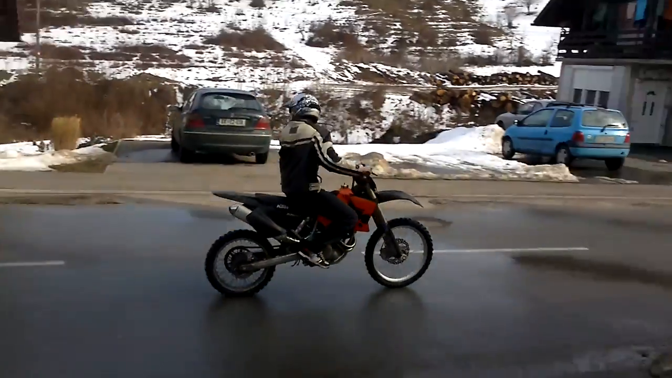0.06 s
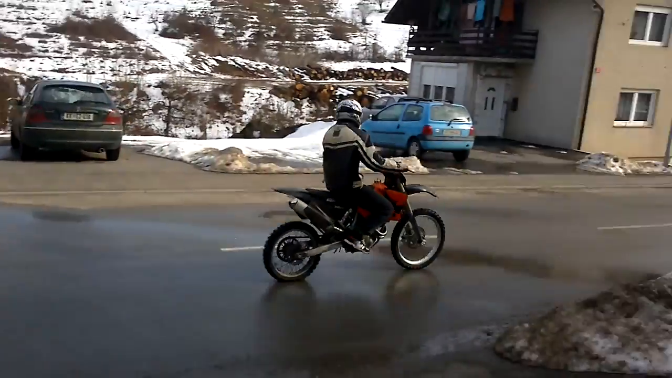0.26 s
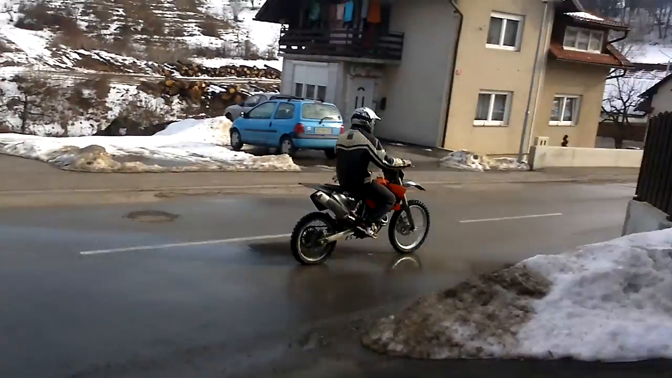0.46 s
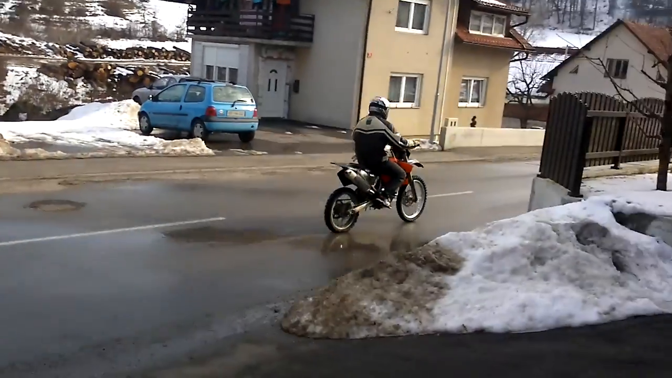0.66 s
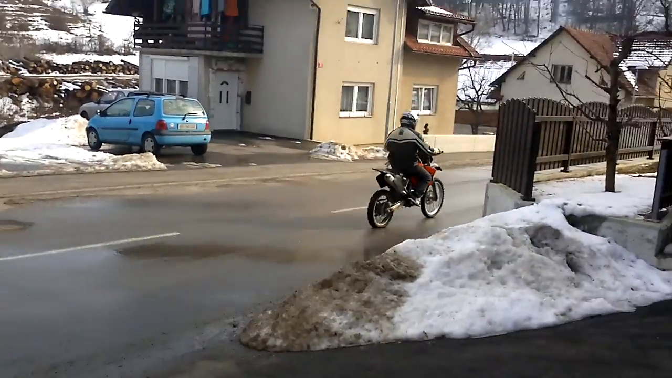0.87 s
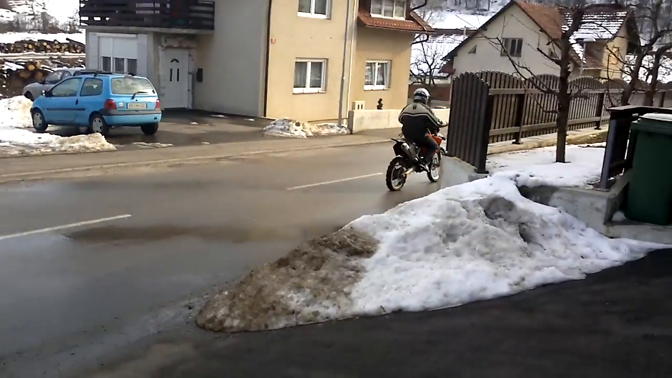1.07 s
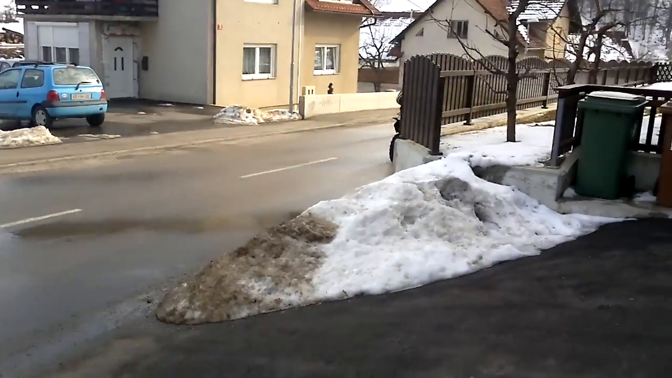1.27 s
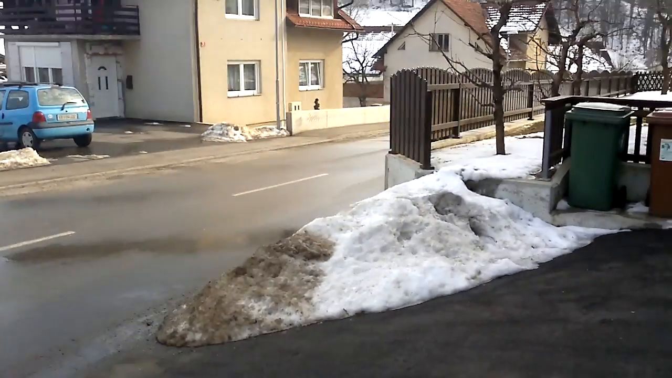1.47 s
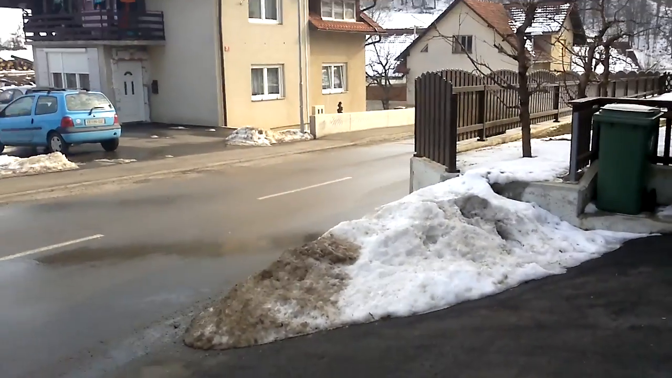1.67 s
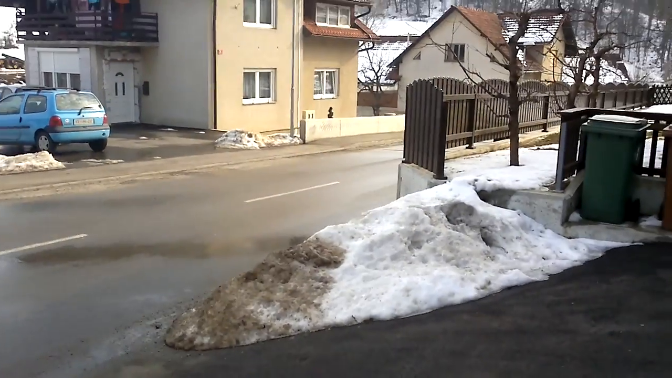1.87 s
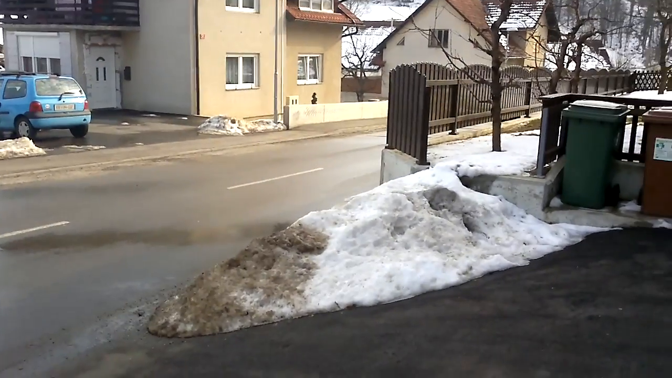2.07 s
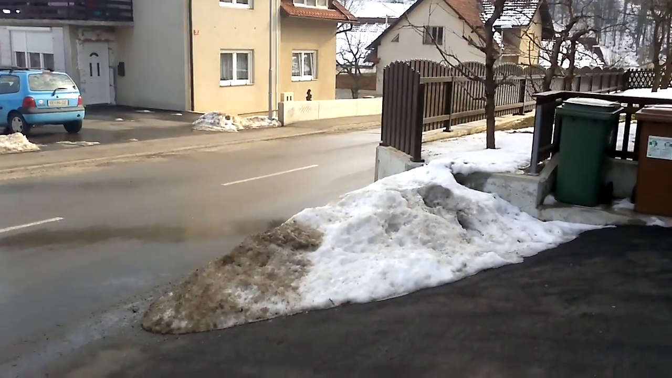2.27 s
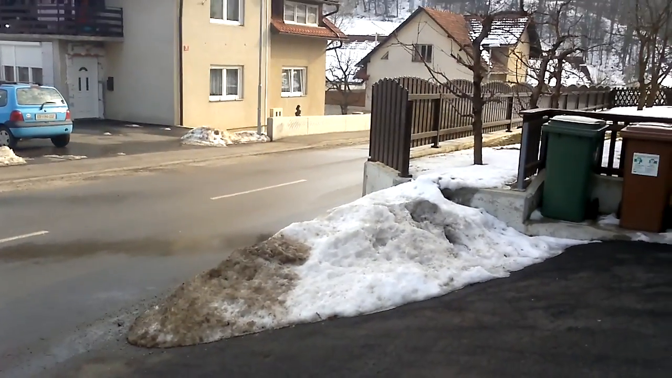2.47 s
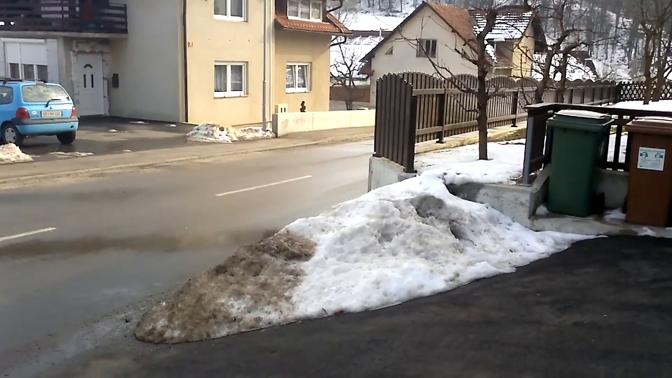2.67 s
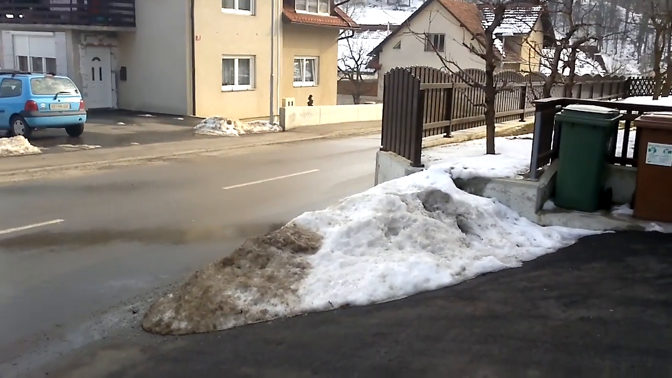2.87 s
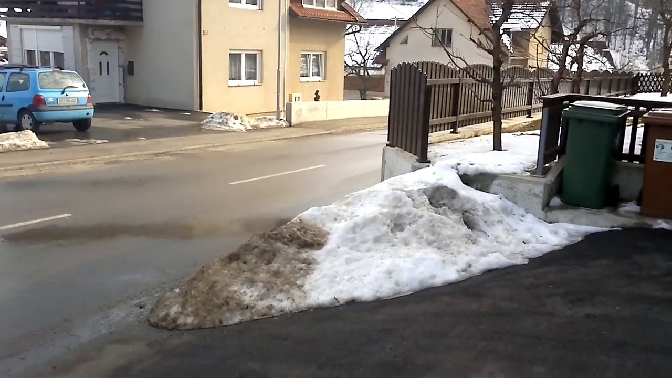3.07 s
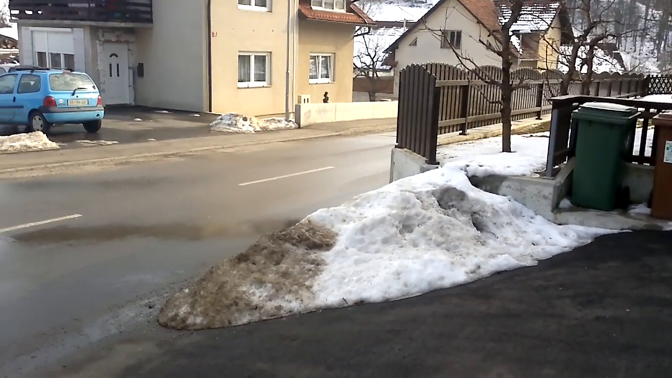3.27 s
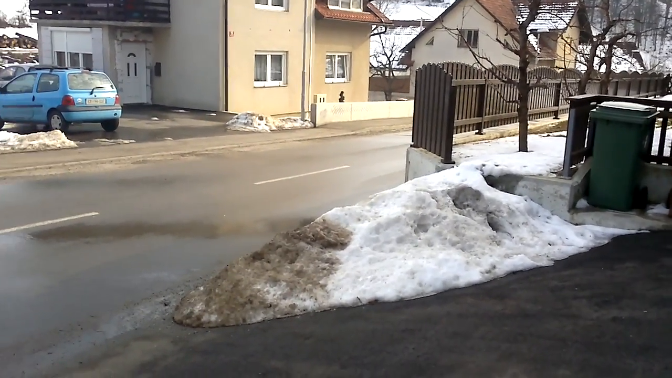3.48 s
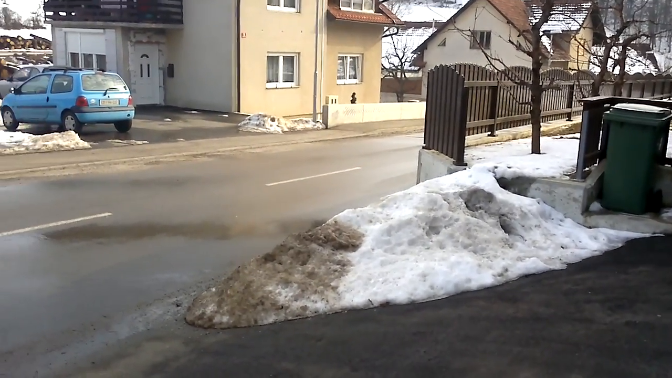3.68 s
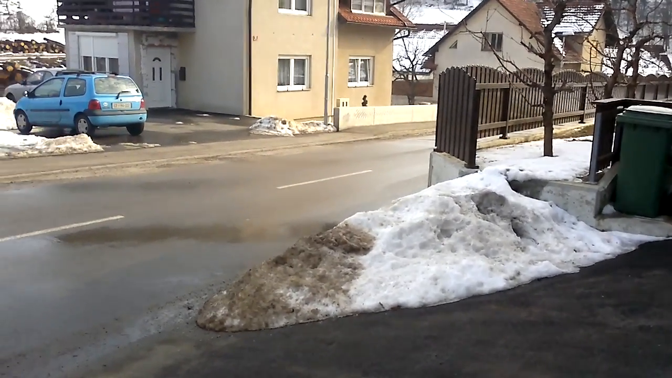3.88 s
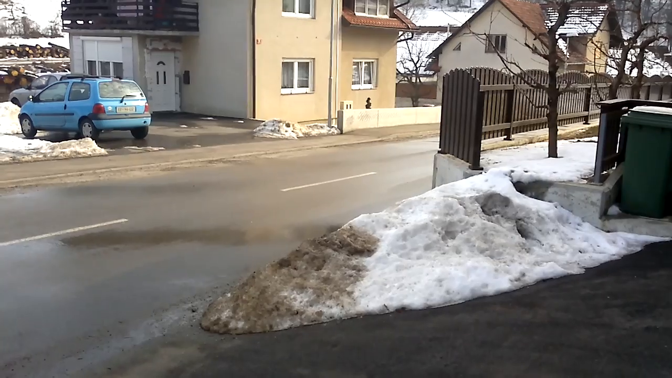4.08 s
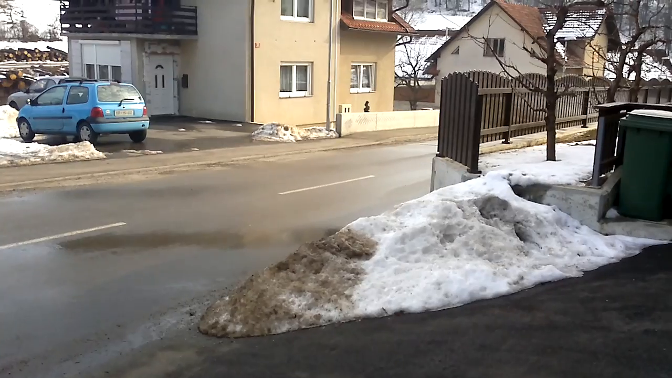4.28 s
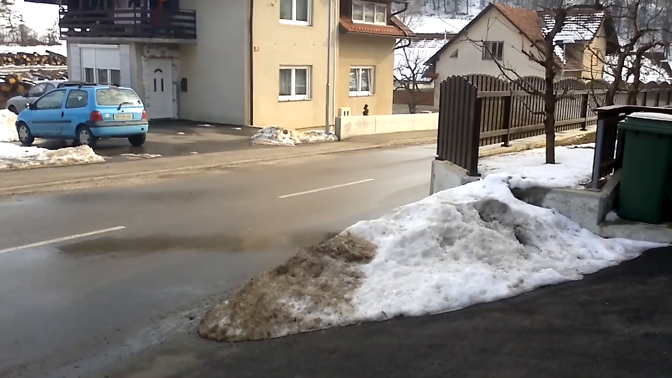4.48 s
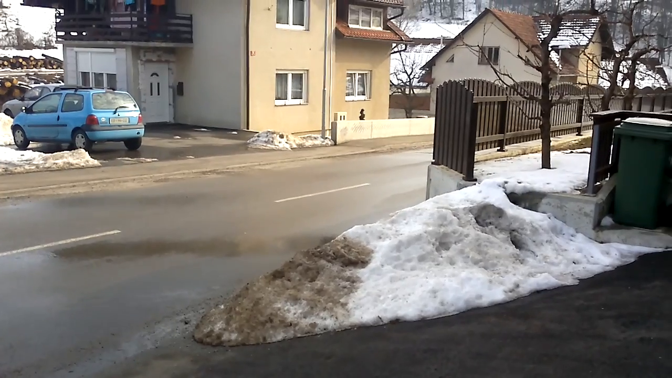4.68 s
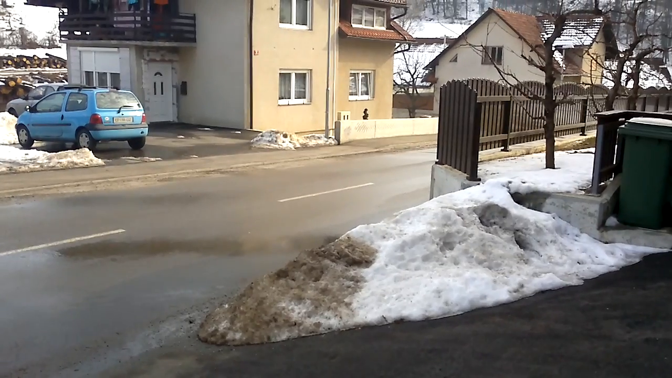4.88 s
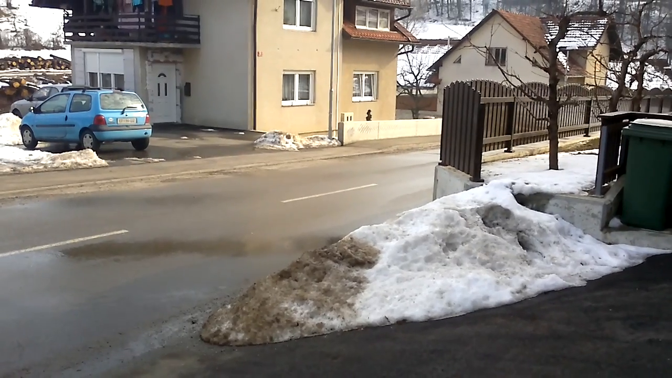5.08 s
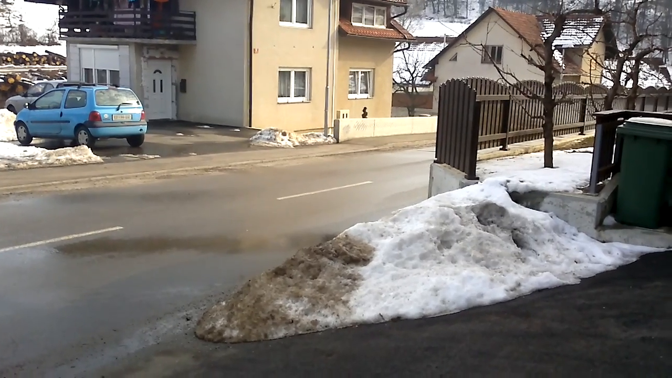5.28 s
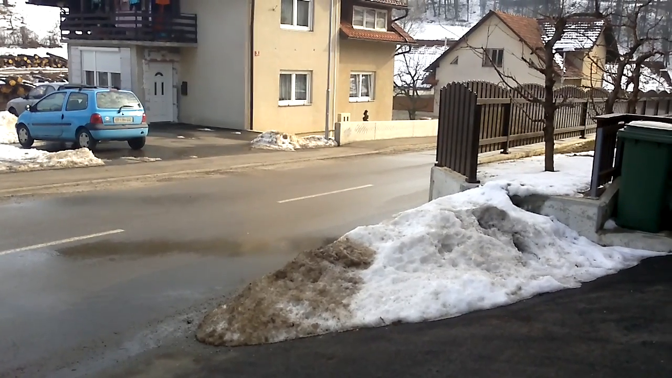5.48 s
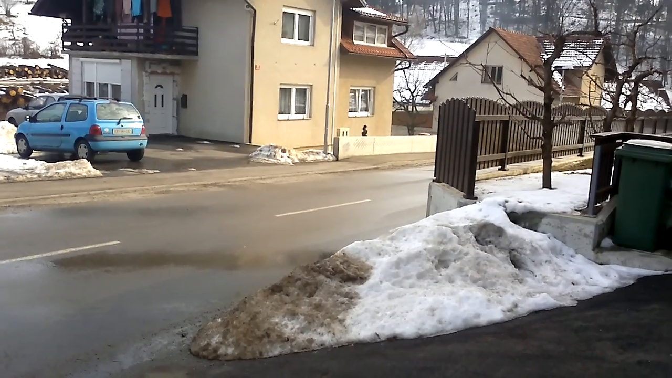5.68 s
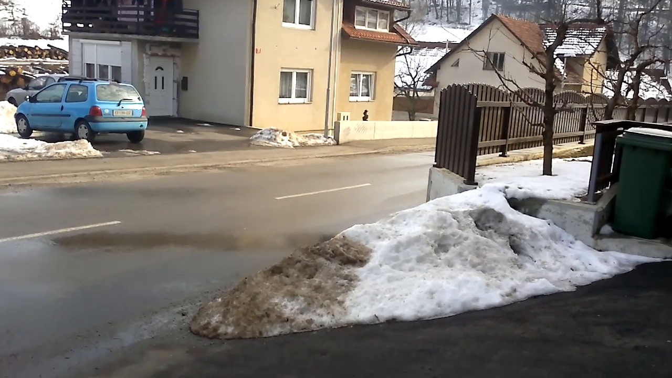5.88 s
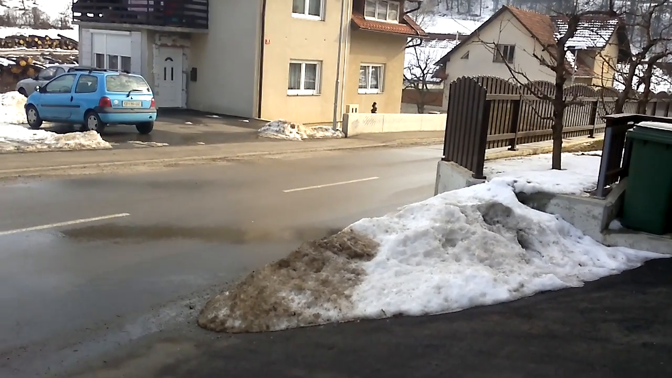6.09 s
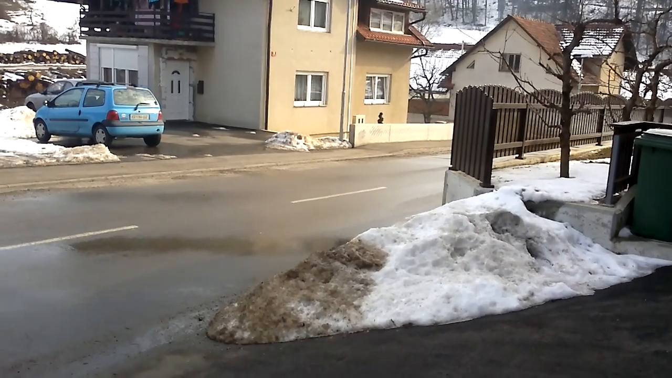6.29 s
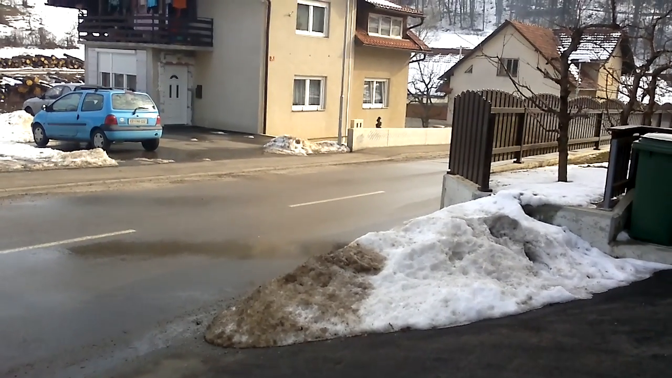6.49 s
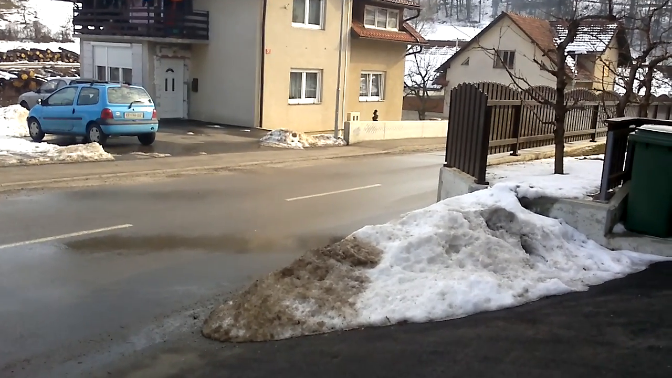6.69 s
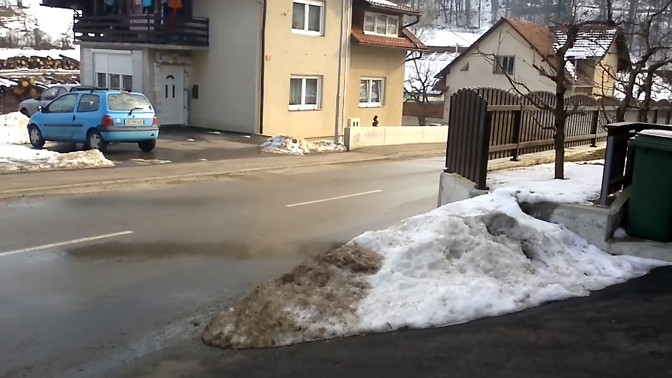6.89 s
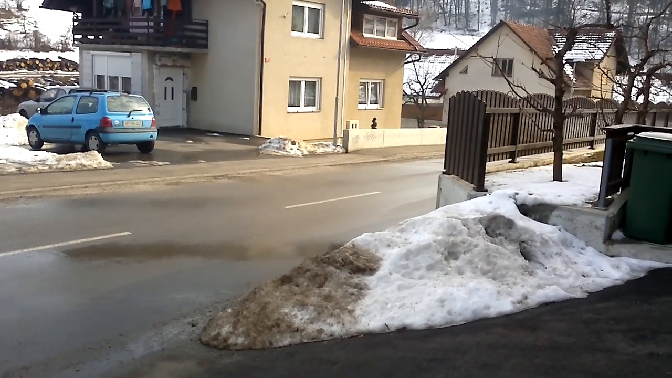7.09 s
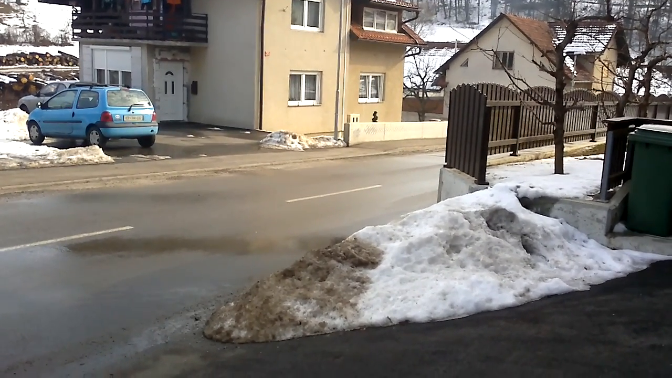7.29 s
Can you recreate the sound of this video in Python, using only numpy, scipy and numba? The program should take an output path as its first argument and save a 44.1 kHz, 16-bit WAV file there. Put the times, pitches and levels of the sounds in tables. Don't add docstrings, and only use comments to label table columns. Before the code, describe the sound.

The sound starts at full presence: a single-cylinder four-stroke motorbike alongside, thudding about 33 times a second, with throaty silencer ring, a touch of chain whine, gas roar and bright wet tyre spray, the hiss leaning right at moments. The exhaust is strongest around 0.5 s, then hiss and level drop as it pulls away. Sharp camera knocks click at 1.1 and 1.4 s, with light brushes after. Revs climb gently to about 2.4 s; near 2.7 s the throttle closes with a thump and a missed firing. From 2.9 s the note is rough and loping, alternate beats weak, slowly evening out and sinking in pitch. House reflections shift its tone. After 4.4 s distant hiss flickers between houses and dulls. Knocks and grainy finger rubs crowd 5.9-6.6 s, mostly left later. The low engine drone fades almost away by 7.3 s over faint wind rumble and rising microphone noise.

```python
import sys
import numpy as np
from scipy import signal
from scipy.fft import rfft, irfft
from scipy.io import wavfile
from scipy.ndimage import uniform_filter1d
from numba import njit

SR = 44100
rng = np.random.default_rng(int(sys.argv[2]) if len(sys.argv) > 2 else 0)


def attenuation_scalar(level_db):
    decades = np.asarray(level_db, float) / 20
    return 10 ** decades


def inscribe(sig):
    pcm = np.round(np.clip(np.atleast_2d(sig).T, -1, 1) * 32767)
    wavfile.write(sys.argv[1], SR, pcm.astype(np.int16))


N = 323694
T = np.arange(N) / SR

# pitch_hz, left_db, right_db
ROAR_COLOUR = [(343, -45, -19.5), (384, -13.5, -11.5), (560, -4.5, -4), (655, -9.5, -7.5), (735, -5.5, -3),
               (890, -3.5, 0.5), (1060, -4, -0.5), (1420, -6.5, -7), (1836, -9, -8.5), (2204, -20, -20.5),
               (2700, -38, -50.5)]


def curves(table):
    s, *columns = np.transpose(table)
    return [np.interp(T, s, c) for c in columns]


def unit(x):
    return x / np.sqrt(np.mean(x ** 2))


def smooth(x, samples):
    return uniform_filter1d(uniform_filter1d(x, samples), samples)


@njit
def svf(x, hz, width, low):
    y, b, l = np.empty(len(x)), 0., 0.
    for i in range(len(x)):
        g, k = np.tan(np.pi * hz[i] / SR), width[i] / hz[i]
        v = (b + g * (x[i] - l)) / (1 + g * (g + k))
        y[i] = low * (l + g * v) + (1 - low) * k * v
        b, l = 2 * v - b, l + 2 * g * v
    return y


def band(x, hz, width):
    return svf(x, hz + np.zeros(N), width + np.zeros(N), 0.)


def band_twice(x, hz, width):
    return band(band(x, hz, width), hz, width)


def band_ports(x, hz, width):
    return np.array([band(v, hz, width) for v in x])


def butter(x, poles, hz, kind="low"):
    return signal.sosfilt(signal.butter(poles, hz, kind, fs=SR, output="sos"), x)


def steady(x, span_s=0.25):
    return x / np.sqrt(smooth(x ** 2, int(span_s * SR)) + 1e-12)


def resonance(x, hz, width):
    return steady(band_twice(x, hz, width))


def walk(rate):
    k = int(SR / rate)
    return 2.6 * smooth(np.repeat(rng.standard_normal(N // k + 1), k), k)[:N]


def ports(table, alike_hz, least=.1):
    # pitch_hz, left_lead_rad
    port_phase = [(0, 1), (780, 0.28), (1290, 1.0), (1810, 0.87), (2150, 2), (2670, -1.5), (3270, -7),
                  (3530, 3), (3960, -5.5), (4390, -3.5), (4820, 1.5), (5940, 2.5), (6980, 22), (7840, 20)]
    hz, *colour_db = np.transpose(table)
    f = np.fft.rfftfreq(N, 1 / SR) + 1e-3
    alike = np.clip(least + (1 - least) / (1 + (f / alike_hz) ** 2), 0, 1)
    left, own = rfft(rng.standard_normal((2, N)))
    lead = np.interp(f, *np.transpose(port_phase))
    right = (alike * left + np.sqrt(1 - alike ** 2) * own) * np.exp(-1j * lead)
    gain = attenuation_scalar(np.array([np.interp(np.log(f), np.log(hz), c, -90, -90) for c in colour_db]))
    return unit(irfft(np.array([left, right]) * gain, N))


def pan(db):
    pair = attenuation_scalar(np.array([db, -db]) / 2)
    return pair / np.sqrt(np.mean(pair ** 2, axis=0))


def firings(rate_hz, skip_s):
    # time_s, level_db over the neighbours
    odd_firings = [
        (.45, 1.5),
        (2.665, -4),
        (2.695, 2),
        (2.725, -1),
        (2.755, 2.5),
        (3.625, 2.5),
        (4.094, 3.5),
        (4.35, 2),
        (4.415, -1.5),
    ]
    half_cycle_s = .5 / rate_hz
    event_db = -15. * (np.abs(T - 2.782) < half_cycle_s)
    for s, db in odd_firings:
        event_db += db * (np.abs(T - s) < half_cycle_s)
    skip_db = -13 * (T > skip_s) * np.exp(-(T - skip_s) / .36)
    cycles = 1.08 + np.cumsum(rate_hz) / SR + .0025 * walk(30)
    number = np.maximum.accumulate(cycles.astype(int))
    scatter_db = .35 + 1.0 * np.exp(-((T - 3.8) / 1.1) ** 2)
    scatter = rng.standard_normal((400, 2))[number, 0]
    strength_db = event_db + skip_db * (number % 2) + scatter_db * scatter
    return smooth(np.diff(number, prepend=0) * attenuation_scalar(strength_db), 40), cycles % 1


def street_returns(fired):
    # delay_s at the start, growth_s_per_s, level_db
    echoes = [
        (.004, 0.001022, -22.5),
        (.013, 0.003036, -11.5),
        (.031, .005, -14),
    ]
    pulses = fired.copy()
    for delay_s, growth, db in echoes:
        pulses += attenuation_scalar(db) * np.interp(T - delay_s - growth * T, T, fired, 0)
    t60_s, street_db = .4, -13
    tail = np.exp(-np.log(1000) * T[:SR] / t60_s) * rng.standard_normal((2, SR))
    street, side = signal.fftconvolve(fired[None], tail / np.linalg.norm(tail[0]), axes=1)[:, :N]
    return pulses + attenuation_scalar(street_db) * street, side


def exhaust():
    # time_s, firing_rate_hz, exhaust_level_db, gas_effort_db that roughens the note
    engine = [(0, 34.7, -19, 9.5), (.14, 33.28, -19, 3), (.5, 32.67, -15.5, -2), (.9, 32.68, -23, -5),
              (1.15, 32.85, -22.5, -3.5), (1.65, 34.55, -22, 1), (2.4, 36.8, -25.5, 3.5),
              (2.63, 35.66, -29, 4.5), (2.72, 33.3, -17, -1.5), (2.88, 34.14, -26, 8.5),
              (3.2, 33.33, -19, 0.5), (3.7, 32.07, -20.5, -5.5), (3.93, 31.8, -26, 3.5),
              (4.35, 31.72, -26, 4), (5.05, 30.38, -25.5, 4.5), (5.62, 30.67, -26, 1.5),
              (5.83, 29.1, -26.5, 3.5), (5.97, 30.83, -25, 5), (6.15, 30.35, -26, 0.5),
              (6.6, 30.32, -26, 2.5), (7.1, 30.4, -32.5, 6.5), (7.34, 31.7, -36.5, 6.5)]
    # time_s, ring_hz, ring_width_hz, upper_pipe_mode_hz, upper_mode_share_db
    silencer = [(0, 121, 65.4, 189, -11), (.6, 131, 67, 183, -8), (1.2, 135.6, 50.3, 173.4, -9.5),
                (2, 150.4, 48, 199.1, -6), (2.64, 152.3, 50, 197, -9), (2.69, 110, 56, 171, -11),
                (3.1, 123.4, 44.5, 201, -11), (3.5, 117.4, 35.7, 199.3, -15), (4.2, 122.8, 58.4, 154, -5),
                (5.4, 129.2, 31.2, 156.3, -6.5), (6.4, 135.5, 36, 156.1, -10),
                (7.34, 131, 39.4, 159.6, -6.5)]
    # time_s, second_db, third_db
    box = [(0, -36, -28.5), (.6, -32.5, -29), (1.2, -31.5, -34.5), (2.3, -33.5, -34.5), (2.6, -25.5, -32),
           (2.75, -31, -31), (3.3, -41.5, -27), (3.7, -33.5, -35), (4.4, -29.5, -33), (5.1, -33, -37),
           (5.7, -36.5, -39.5), (6.2, -38.5, -49.5), (6.7, -32, -44), (7.34, -34.5, -49)]
    # time_s, rasp_hz, width_hz
    rasp_band = [(0, 261, 143), (.7, 277, 80), (1.2, 303, 60.5), (1.8, 342, 113), (2.6, 330, 111.2),
                 (2.9, 265.8, 69.7), (3.5, 260, 79.3), (4.2, 248, 90), (4.8, 277, 58), (5.7, 279.6, 62.9),
                 (6.3, 288.9, 90), (7.34, 286, 97)]
    # time_s, fifth_db, sixth_db, seventh_db
    order_lift = [(0, 3.5, -5, -6), (.4, 3, -1.5, 0), (.8, 3.5, 0, -1.5), (1.3, 2, 2.5, 1.5), (1.6, 1, -8, 0.5),
                  (1.9, -1.5, 4, 0.5), (2.2, 5, -6, 0.5), (2.5, -2, 12.5, 0.5), (2.63, 0, -1, 0),
                  (2.8, 6.5, -3, 2), (3.1, 7.5, 5.5, -7), (3.4, -7, 1.5, -2), (3.8, 1.5, -3.5, -3),
                  (4.1, 2.5, 0, 5.5), (4.35, 1, -7.5, -4), (4.6, 0, -7, -6), (5.2, 4, -3, -11), (5.6, 1, 1, 1),
                  (5.9, 1.5, -5, -9), (6.4, 4, -4, -7), (6.8, 1, -0.5, -5), (7.34, 2, 1, 0)]
    # time_s, eighth_db
    eighth = [(0, -1.5), (.8, -2.5), (1.3, 2.5), (2.2, -1), (2.8, -2.5), (3.4, 6), (3.8, -2), (4.3, 5),
              (4.7, -8.5), (5.5, -9.5), (5.85, 3), (6.1, -3.5), (6.5, 2), (7.34, -4)]
    rate_hz, ring_db, effort_db = curves(engine)
    ring_hz, width_hz, pipe_hz, pipe_db = curves(silencer)
    second_db, third_db = curves(box)
    rasp_hz, rasp_width = curves(rasp_band)
    skip_s = 2.86
    fired, phase = firings(rate_hz, skip_s)
    pulses, side = street_returns(fired)

    def order(count, lag_cycles, width):
        return resonance(np.interp(T - lag_cycles / rate_hz, T, fired), count * rate_hz, width)

    pipe_width = 68 + 1.9 * T
    early = np.interp(T + .0013, T, pulses)
    pipe = resonance(band(early, pipe_hz, pipe_width), pipe_hz, pipe_width)
    ring = resonance(pulses, ring_hz, 0.8 * width_hz) - attenuation_scalar(pipe_db) * pipe
    rumble = steady(band(rng.standard_normal(N), 110, 76))
    sound = attenuation_scalar(ring_db) * (ring + attenuation_scalar(-34.0) * rumble)

    thump_db = -31.5 - 25.5 * (1 - np.exp(-np.maximum(T - 3.3, 0) / 0.3))
    sound += attenuation_scalar(thump_db) * order(0.76, .09, 24)
    sound += attenuation_scalar(second_db) * order(1.996, -.24 + .04 * T, 8.6)
    sound += attenuation_scalar(third_db) * order(3.154, -.055, 37)
    sound += attenuation_scalar(ring_db - 21.5 + 3.5 * walk(5.1)) * order(6.08, 0, 27)
    lope = np.clip((T - skip_s) / 0.081, 0, 1) * np.exp(-((T - skip_s) / 0.97) ** 4)
    sound += attenuation_scalar(-33) * lope * order(3 / 2, 0, 4.7)

    rasp_db = ring_db - 16 + effort_db + 1.3 * walk(9)
    rough = .2 + .4 * np.exp(-((T - 3.4) / 1.2) ** 2)
    rasp = resonance(band(pulses, rasp_hz, rasp_width), rasp_hz, rasp_width)
    rasp += rough * resonance(rng.standard_normal(N), 240, 130)
    sound += attenuation_scalar(rasp_db) * steady(rasp)
    for count, db in enumerate(curves(order_lift) + curves(eighth), start=5):
        sound = sound + (attenuation_scalar(db) - 1) * band(sound, count * rate_hz, 0.55 * rate_hz)
    return sound, attenuation_scalar(ring_db - 32.5) * resonance(side, 80, 200), phase


def gas_roar(loss_db, near, puff):
    roar_db = -24 - loss_db
    roar = attenuation_scalar(roar_db + 0.59 * walk(13)) * (1 + 0.65 * near * puff)
    roar = roar * ports(ROAR_COLOUR, alike_hz=2550, least=0.26)
    roar -= 0.63 * np.exp(-((T - 0.78) / 0.53) ** 2) * band_ports(roar, 470, 400)
    whine = unit(band(band(roar[1], 1340, 420), 1350, 420))
    roar += attenuation_scalar(-39.5) * np.exp(-(T / .5) ** 2) * pan(-19.5)[:, None] * (1 + 1.2 * puff) * whine
    carried = unit(band_twice(rng.standard_normal(N), 673, 140))
    return roar + attenuation_scalar(roar_db - 2.5) * (1 - near) ** 2 * carried


def wet_spray(loss_db, screen, near, puff):
    # pitch_hz, left_db, right_db
    spray_colour = [(1740, -15.5, 9), (2340, -4.5, 10.5), (2650, -4, 5), (2900, 2.5, 8), (3830, 1, 3),
                    (4300, -2.5, 4), (5220, -4, -11), (5870, -11, -21.5), (7260, -14.5, -27.5),
                    (8650, -26.5, -28.5), (9700, -34, -46), (10900, -39, -70.5), (15000, -66, -74)]
    # time_s, length_s, loss_db
    gaps = [
        (4.947, 0.044, 2.5),
        (5.112, 0.076, 7),
        (5.226, .05, 6),
        (5.319, 0.05, 7.5),
        (5.56, 0.027, 4),
        (5.667, 0.041, 0.5),
        (5.799, 0.16, 7.5),
        (6.169, 0.077, 9),
        (6.902, 0.55, 4.5),
    ]
    # pitch_hz, time_s
    sizzles = [
        (4900, .04),
        (3200, .13),
        (5450, .16),
        (4300, .55),
        (4600, .64),
    ]
    top_loss_db = 22 * np.clip((T - 1.99) / 6.3, 0, 1) * (1 - 0.5 * screen ** 2)
    top_db = 4.5 + 6 * np.exp(-T / 0.37) - top_loss_db
    both = np.array([unit(v) for v in ports(spray_colour, alike_hz=900, least=0.39)])
    spray = butter(both, 2, 5200) + attenuation_scalar(top_db) * butter(both, 4, 5600, "high")

    hidden = np.clip(screen, 0, 1) ** 2
    gone = np.clip((T - 3) / 1.2, 0, 1)
    kept = attenuation_scalar(-2.5) * (1 - hidden) * band_ports(spray, 3800, 500)
    spray += gone * (kept - 0.7 * band_ports(spray, 2520, 600))
    spray -= 0.55 * np.clip((T - 4.33) / 0.1, 0, 1) * band_ports(spray, 6300, 2600)
    for hz, s in sizzles:
        spray += attenuation_scalar(1.0) * np.exp(-((T - s) / 0.044) ** 2) * band_ports(spray, hz, 350)

    spray_db = -33 - loss_db - 13 * screen
    for s, span_s, db in gaps:
        spray_db -= db * np.exp(-(2 * (T - s) / span_s) ** 2)
    far = np.clip(T - 4.4, 0, 1)
    flutter_db = (0.5 + 0.37 * far) * walk(22) + 0.4 * walk(5.0)
    pan_db = (1 - hidden) * (6 + 2 * T) + hidden * 3
    return attenuation_scalar(spray_db + 5.0 + flutter_db) * (1 + 1.0 * near * puff) * pan(pan_db) * spray


def hiss(phase):
    # time_s, distance_loss_db, screening by fence and houses (0-1)
    path = [(0, -1, 0.29), (.14, 2, 0), (.3, 0.5, 0.15), (.55, 2, 0.22), (.78, 5, 0.3), (1.1, 9.5, 0),
            (1.6, 11.5, 0.1), (2.15, 11.5, 0), (2.62, 10, 0.17), (2.77, 10.5, 0.19), (3.15, 11, 0.11),
            (3.6, 16.5, 0.02), (3.9, 14.5, 0.23), (4.15, 15.5, 0), (4.35, 16, 0.08), (4.5, 18.5, 0.04),
            (4.85, 18, 0.34), (5.2, 18.5, 0.62), (5.8, 21.5, 0.76), (6.6, 20.5, 0.98), (7.34, 27, 0.98)]
    loss_db, screen = curves(path)
    near = np.exp(-T / 3.1)
    puff = uniform_filter1d(np.exp(-phase / 0.18) - .3, size=160)
    return gas_roar(loss_db, near, puff) + wet_spray(loss_db, screen, near, puff)


def body_ticks():
    # time_s, peak_db, left_minus_right_db,
    # ring_hz, t60_s
    short_rings = [(1.1133, -6, -33, 4400, .0023), (1.1133, -6.5, -17, 3000, .001),
                   (1.114, -21, 21, 6500, .005), (1.1135, -24, 20, 11000, .001),
                   (1.276, -32, 10, 5940, .0054), (1.4376, -12, 22, 5530, .0035),
                   (1.4377, -19, 12, 3900, .002), (1.4377, -22, 15, 11000, .001),
                   (1.438, -17, -5, 1367, .009), (1.4393, -28, 20, 5300, .002), (2.755, -26, -1, 300, .06),
                   (2.762, -24, 0, 1300, .02), (2.772, -34, 10, 3500, .004), (4.1764, -29, 20, 4000, .0032),
                   (5.9512, -30, 0, 9500, .0012), (5.952, -33, 0, 5000, .002),
                   (5.953, -22.5, -11, 1442, .01), (5.954, -13.5, -7, 550, .0047),
                   (5.9543, -30, 3, 2950, .0019), (6.068, -25, 5.5, 513, .014),
                   (6.068, -38, 1, 4520, .0013), (6.178, -46, 8, 9500, .001), (6.209, -21, 5, 559, .008),
                   (6.21, -42, 7, 6200, .0015), (6.2527, -37, 2, 3784, .0057), (6.2527, -39, 5, 9500, .001),
                   (6.2531, -19, -8, 900, .0084)]
    out, t = np.zeros((2, N + SR)), np.arange(int(.05 * SR)) / SR
    for s, db, pan_db, hz, t60 in short_rings:
        onset = 1 - np.exp(-(t * hz / 0.11) ** 2)
        ring = np.sin(2 * np.pi * hz * t) * np.exp(-np.log(1000) * t / t60) * onset
        start = int(s * SR)
        out[:, start:start + len(t)] += attenuation_scalar(db) * np.outer(pan(pan_db), ring / ring.max())
    return butter(out, 4, 7500)[:, :N]


def finger_rubs():
    # start_s, end_s, low_db, treble_db, treble_left_minus_right_db, fine_hiss_share (0-1)
    rubs = [
        (5.927, 5.939, -41, -58, 1.5, 0),
        (5.947, 6.037, -45, -46, -2, 0.3),
        (6.042, 6.138, -61, -61, 14, 0.1),
        (6.261, 6.34, -38.5, -45, 7, 0.05),
        (6.339, 6.407, -43.5, -48.5, 7, 0.02),
        (6.404, 6.46, -39.5, -43, 13, 0.08),
        (6.463, 6.502, -45.5, -58, 14, 0.2),
        (6.56, 6.618, -48, -63, 12, 0.1),
    ]
    # start_s, end_s, low_db, treble_db, treble_left_minus_right_db
    brushes = [
        (1.464, 1.58, -62, -53.5, 12.5),
        (1.716, 1.794, -69, -55, 13),
        (2.081, 2.165, -59, -55.5, 10),
        (2.786, 2.808, -60, -59.5, 5.5),
        (2.852, 2.949, -65, -66.5, 10),
    ]
    # pitch_hz, width_hz, left_db, right_db
    rub_modes = [
        (2460, 820, -9.5, 2.5),
        (3080, 330, 1.5, -1),
        (3772, 600, 4, -5.5),
        (4950, 700, -7, -11),
        (6900, 1200, -14.5, -25),
    ]
    low = ports(ROAR_COLOUR, alike_hz=2500, least=0.36)
    skin = attenuation_scalar(2.0 * walk(70)) * rng.standard_normal((2, N))
    modes = np.zeros((2, N))
    for hz, width, left_db, right_db in rub_modes:
        modes += attenuation_scalar([[left_db], [right_db]]) * band_ports(band_ports(skin, hz, width), hz, width)
    modes = np.array([unit(v) for v in modes])
    fine = unit(butter(skin, 1, [4600, 6500], "band") + 0.05 * skin)
    out = np.zeros((2, N))
    for start, end, low_db, treble_db, pan_db, share in [(*b, 1) for b in brushes] + list(rubs):
        gate = np.clip(np.minimum(T - start, end - T) / 0.044 + .5, 0, 1)
        treble = pan(pan_db)[:, None] * ((1 - share) * modes + share * fine)
        out += gate * (attenuation_scalar(low_db) * low + attenuation_scalar(treble_db) * treble)
    return out


def wind():
    mid, side = (unit(band_twice(v, 43.7, 90)) for v in rng.standard_normal((2, N)))
    return attenuation_scalar(-41 + 1.3 * walk(3.7)) * np.array([mid + .3 * side, mid - .3 * side])


def microphone_floor():
    floor = signal.lfilter([.5], [1, -.3], rng.standard_normal((2, N)))
    return attenuation_scalar(-88 + 3 * T) * floor


def scene():
    boom, side, phase = exhaust()
    lag = 4
    left = np.r_[np.zeros(lag), boom[:-lag]] + side
    bass = pan(2.0)[:, None] * np.array([left, boom - side])
    return bass + hiss(phase) + body_ticks() + finger_rubs() + wind() + microphone_floor()


def low_pass(x):
    return signal.sosfilt(signal.butter(12, 15700, fs=SR, output="sos"), x)


def record(dry):
    mix = np.clip(dry, -1, 1)
    return low_pass(mix)


dry = scene()
out = record(dry)
inscribe(out)
```